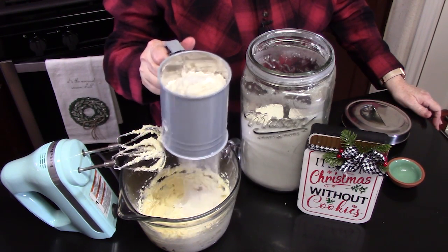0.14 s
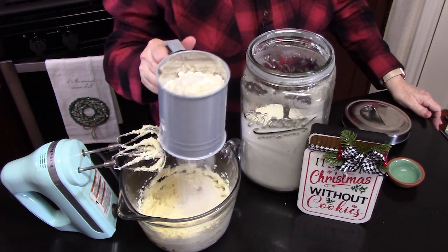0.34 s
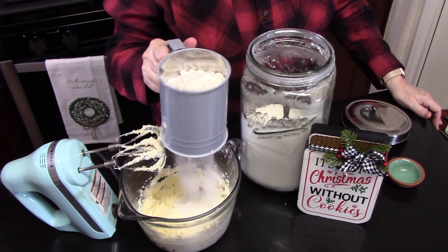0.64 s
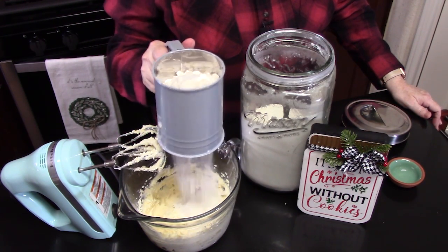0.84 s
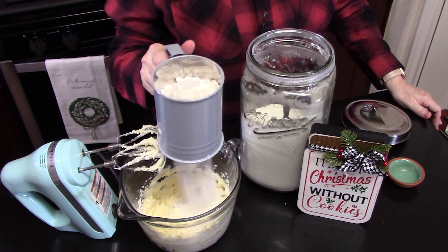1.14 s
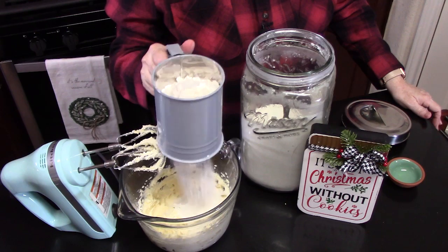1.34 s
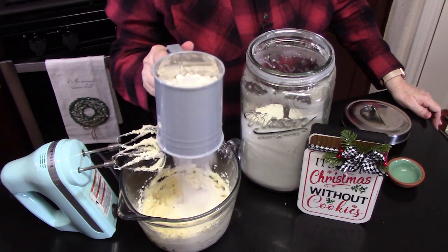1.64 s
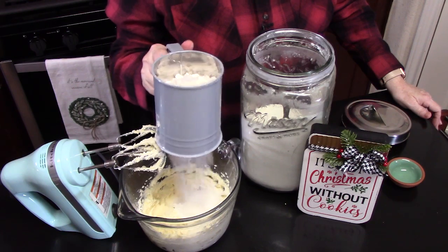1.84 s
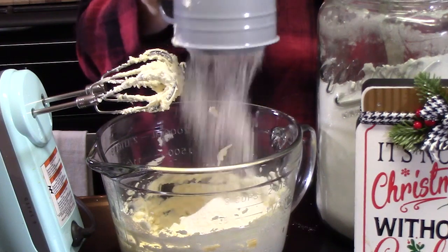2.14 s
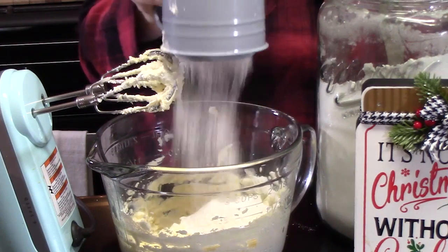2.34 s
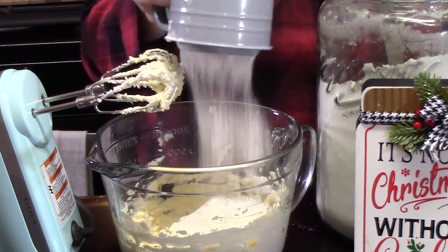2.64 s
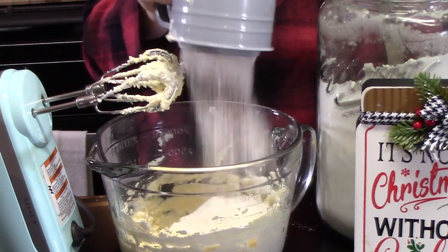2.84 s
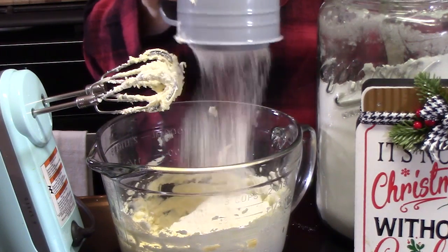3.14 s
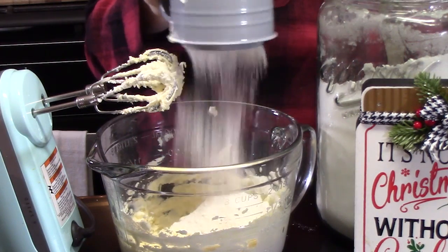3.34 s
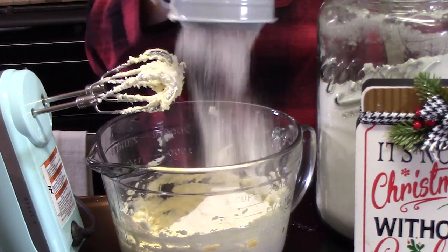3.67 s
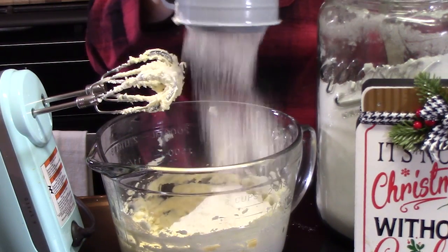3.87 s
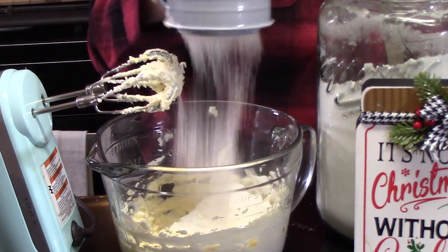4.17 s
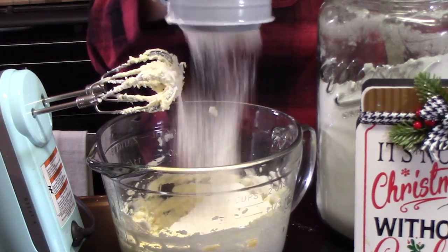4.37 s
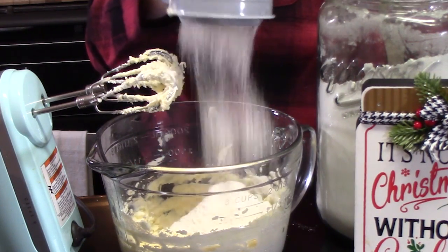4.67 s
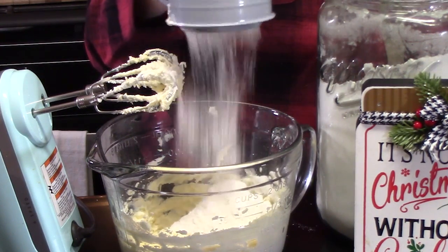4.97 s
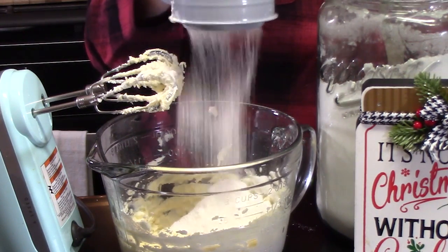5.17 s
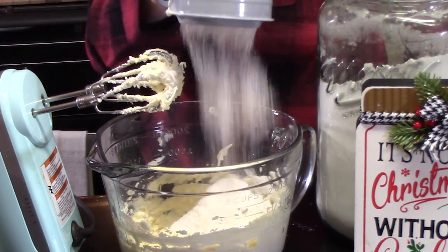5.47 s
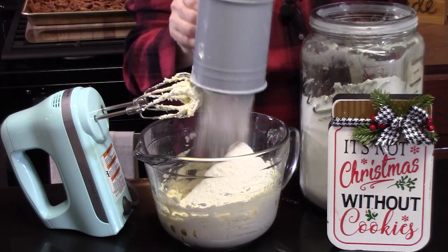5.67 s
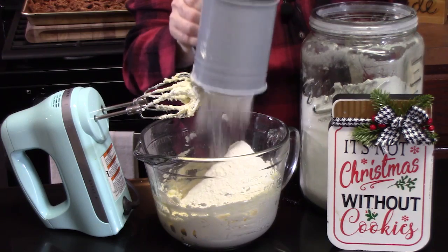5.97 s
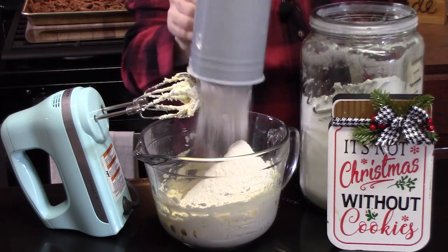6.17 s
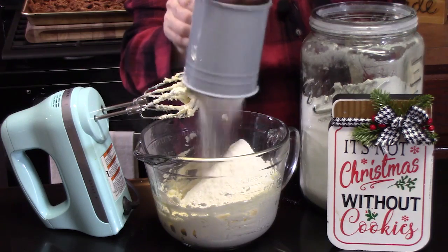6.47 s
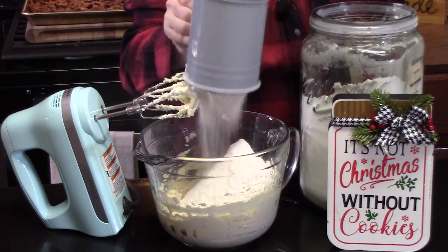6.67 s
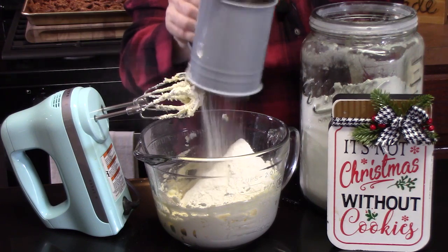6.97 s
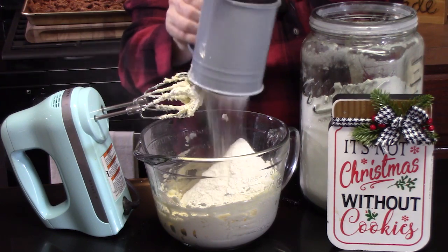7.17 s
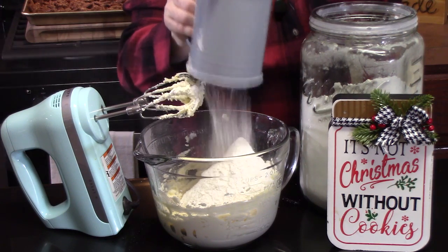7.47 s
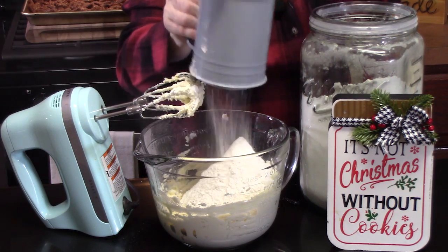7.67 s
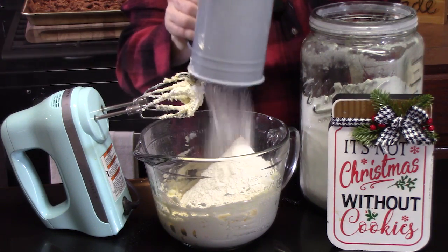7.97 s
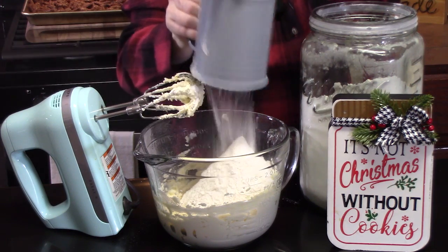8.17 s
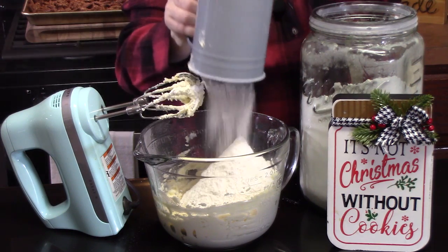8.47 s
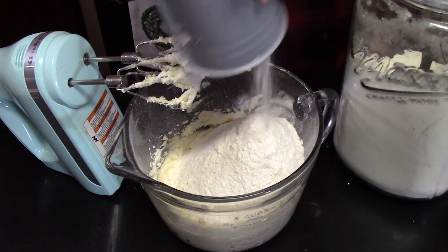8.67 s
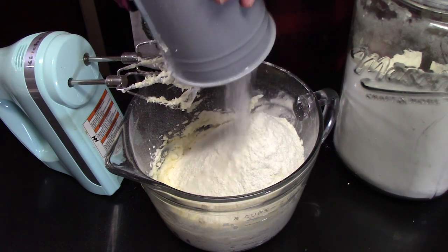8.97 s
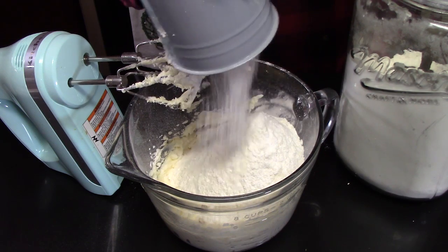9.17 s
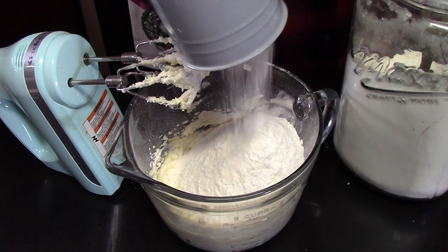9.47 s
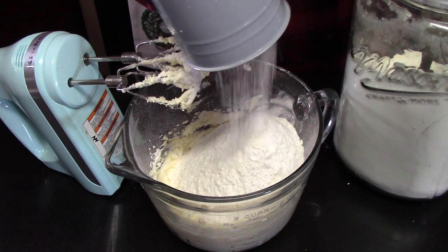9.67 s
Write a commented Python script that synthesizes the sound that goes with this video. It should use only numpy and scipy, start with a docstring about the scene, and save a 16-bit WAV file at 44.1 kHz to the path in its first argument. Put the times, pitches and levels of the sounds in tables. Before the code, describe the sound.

Rapid clicking and soft scraping from a hand sifter give way to hollow, rattling knocks on its can, then sharp, raspy squeezes.

```python
"""In a kitchen, a thin metal flour sifter with a squeeze handle is worked over a glass bowl.
Each squeeze clicks as the lever catches, hits its stop and lets go, while a blade scrapes flour
over the mesh. Midway the can is knocked instead: its wall rings, the air inside gives a hollow thud
and the loose blade rattles. Slower, harder squeezes follow. The room adds a short echo and a faint hiss."""
import sys
import numpy as np
from scipy import signal
from scipy.fft import rfft, irfft, next_fast_len
from scipy.io import wavfile
from scipy.ndimage import uniform_filter1d

SR = 44100
rng = np.random.default_rng(int(sys.argv[2]) if len(sys.argv) > 2 else 0)


def master_out(mix):
    """Clip the mix to full scale and print it as 16-bit PCM to the path in sys.argv[1]."""
    frames = np.transpose(np.atleast_2d(mix))
    ceiling = np.clip(frames, -1, 1)
    pcm = np.round(ceiling * 32767).astype(np.int16)
    wavfile.write(sys.argv[1], SR, pcm)


N = 433062
T = np.arange(N) / SR
AGE = np.arange(SR // 3) / SR   # seconds since a hit

# Levels in the tables are relative: the functions set how loud each layer ends up.
# rumble and hiss of the still kitchen: f/Hz, level/dB
ROOM_TONE = [(12, -35), (20, 0), (146, -6), (328, -10.5), (542, -11), (642, -12.5), (1190, -15),
             (1910, -17), (2530, -17), (2820, -18), (3250, -18), (7310, -18.5), (14700, -21), (16000, -26)]
# how alike that noise is in both ears: f/Hz, likeness (0 to 1)
EAR_LIKENESS = [(60,0.92),(600,0.41),(1500,0.43),(4000,0.099),(10000,0.029)]
# the can's own notes: f/Hz, time to fade 60 dB/s, level/dB for a catch, a stop, a release and a slam
CAN_NOTES = [(433,0.0097,-23,-19,-30,-25),(972,0.029,-29,-4.5,-36,-14),(1287,0.015,-18,3,-27,7.5),(2438,0.009,7,0.5,2,-21),
             (3320,0.012,0,1.5,-1,-6.5),(4220,0.0037,-0.5,-1,-12,-10),(5050,0.0023,-4,1,-8,-24),(6186,0.011,-27,2.5,-4,2.5),
             (6940,0.0043,-6,7,9.5,-3),(7810,0.0031,13.5,13.5,3,5),(8130,0.0033,8.5,3,7,-15),(9280,0.0031,-15,10.5,7,-18),
             (10530,0.0035,-5,2.5,5.5,2),(11760,0.0046,-5,8.5,-4,2),(14000,.003,-20,-50,-25,-24)]
# how bright the sifter sounds over time: t/s, treble tilt/(dB per octave)
BRIGHTNESS = [(0,1.5),(.9,2),(1.8,1.5),(2.05,-3),(2.9,-1.4),(3.7,-1.5),(4.6,-2.5),(5.6,-2),(8.65,2.5),(9.0,2.5),(9.8,1.5)]
# narrow bands where the tight mesh rings: f/Hz, width/Hz, boost/dB
MESH_RINGS = [(1126,130,4),(1282,59,6),(1384,102,6),(1990,180,2.5),(2340,150,3),(2756,175,5),(3240,90,2.5)]
# knocks on the can: t/s, thud level/dB, hollow ring's base f/Hz, wall level/dB
KNOCKS = [(5.72, -21.5, 506, -30), (5.885, -17, 515, -32), (6.05, -18.5, 443, -36), (6.226, -10, 452, -33),
          (6.4, -16.5, 532, -31), (6.579, -14, 513, -33.5), (6.755, -18, 492, -32),
          (6.929, -15.5, 515, -36), (7.108, -22.5, 424, -38), (7.283, -19, 512, -40),
          (7.459, -11, 475, -34), (7.635, -13, 493, -36), (7.81, -10, 483, -28.5),
          (7.985, -12.5, 489, -28.5), (8.156, -18.5, 474, -36), (8.331, -12, 511, -32.5),
          (8.497, -10.5, 523, -30)]
# hollow notes left after a knock: multiple of its base pitch, level/dB, time to fade 60 dB/s
HOLLOW_NOTES = [(.71,-25.5,0.22),(.83,-18,0.12),(.99,-17.5,0.28),(1.05,-20,.26),(1.109,-27,0.26)]
# tone of the loose blade rattling: f/Hz, level/dB
RATTLE_TONE = [(300,-17),(800,1.5),(1400,0),(1900,-1.5),(3000,-0.5),(4000,-6.5),(6000,-7),(8000,-6),(9500,-14.5),(12000,-10.5),(16000,-37)]
# hard squeezes slam the lever home: t/s, click level/dB, wall f/Hz, wall level/dB, wait to let go/s
SLAMS = [(8.6462, -7, 2310, -29, 0.12), (8.9222, -8.5, 1280, -38, 0.081),
         (9.1552, -7.5, 1295, -29.5, 0.077), (9.3769, -9, 1350, -34, .0661),
         (9.5991, -8.5, 1300, -23.5, .0644), (9.8106, -10, 1220, -31, .07)]
# tone of the blade on nearly bare mesh: f/Hz, level/dB
BARE_MESH_TONE = [(100,-36),(350,2),(700,-5),(950,4.5),(1350,0.5),(1700,0.5),(2900,4),(4300,1),(7000,0),(10000,-5.5),(12500,-7.5),(16000,-28)]
# the blade ticks against its rest: t/s, level/dB
TICKS = [(0.173, -26), (0.604, -32), (0.804, -30.5), (9.0723, -25), (9.7346, -25.5)]
# quick squeezes: t/s, travel to the stop/s, wait to let go/s, catch level/dB, stop level/dB
SQUEEZES = [(0.0324, 0.047, 0.042, -25, -15.5), (.263, 0.043, .0372, -25.5, -21.5),
            (.4738, 0.044, 0.027, -24.5, -22.5), (0.6676, 0.046, .0358, -22.5, -16),
            (.8827, .0401, 0.04, -26, -10.5), (1.0924, .0407, 0.041, -22, -9),
            (1.3027, 0.04, .0367, -25, -10.5), (1.508, 0.041, 0.029, -26, -13.5),
            (1.709, .0417, 0.028, -25.5, -10.5), (1.904, 0.04, .013, -25, -36),
            (2.058, .0395, 0.049, -19.5, -10.5), (2.2504, .0405, .0458, -21, -11),
            (2.4483, 0.045, 0.042, -27, -13), (2.649, 0.039, 0.041, -23, -12),
            (2.8497, 0.042, .0437, -22, -14), (3.055, .042, 0.035, -23, -15.5),
            (3.2491, 0.04, .0442, -23.5, -14), (3.453, 0.044, 0.044, -26, -32),
            (3.6648, .0397, .0469, -22.5, -18), (3.872, 0.042, .0369, -24, -22.5),
            (4.0764, .0427, 0.038, -26, -17), (4.2812, 0.044, 0.027, -28, -20),
            (4.4726, 0.043, .0336, -23.5, -18.5), (4.675, .0426, 0.043, -22.5, -15),
            (4.8878, 0.042, 0.036, -23, -17), (5.0932, 0.041, 0.046, -22.5, -15),
            (5.3013, 0.045, 0.038, -28, -18), (5.511, 0.043, .0225, -23, -21.5)]
# tone of the blade on mesh muffled by flour: f/Hz, level/dB
FLOURY_MESH_TONE = [(80,-20),(250,1),(560,1.5),(750,-12),(1000,1),(1300,-1),(1700,-0.5),(2400,-5),(3300,-3),(4300,-6),(7000,-8.5),(10000,-11.5),(13000,-15),(16000,-35)]
# the scrape softens as the cup empties: t/s, level/dB
SCRAPE_LEVEL = [(0, -41.5), (1.7, -40.5), (2.0, -43.5), (2.7, -41), (3.8, -42), (4.35, -44.5), (5.5, -44.5)]

REGRIP_S, KNOCKING_END_S = 5.578, 8.56   # the hand changes its hold to knock; it stops knocking


def from_db(db):
    """Turn decibels into a number to multiply by."""
    return 10 ** (np.asarray(db) / 20)


def unit(x, size=None, axis=None):
    """Scale a sound to an average strength (rms) of 1 over its first `size` samples."""
    return x / np.sqrt(np.mean(x[..., :size] ** 2, axis=axis, keepdims=True) + 1e-20)


def at_hz(points, hz):
    """Look up a table's value at any frequency."""
    f, value = np.transpose(points)
    return np.interp(np.log(hz + 1), np.log(f), value)


def colour(x, tone):
    """Shape the bass and treble of a steady sound to follow a tone table."""
    size = next_fast_len(N)
    gains = from_db(at_hz(tone, np.arange(size // 2 + 1) * SR / size))
    return unit(irfft(rfft(x, size) * gains, size)[..., :N])


def gentle_filter(x, hz, keep="low", order=1):
    """Keep the low or the high side of a frequency and fade the other."""
    return signal.sosfilt(signal.butter(order, hz, keep, fs=SR, output="sos"), x)


def add(track, s, sound):
    """Mix a sound into a track at `s` seconds."""
    start = min(max(round(s * SR), 0), N)
    track[..., start:start + sound.shape[-1]] += sound[..., :N - start]


def ring(hz, t60, phase=0):
    """One pure note that fades by 60 dB in `t60` seconds."""
    return np.sin(2 * np.pi * hz * AGE + phase) * from_db(-60 * AGE / t60)


def stroke(start, end, rise, fall, first_db):
    """Loudness of one sweep: it picks up, changes steadily and runs out (times in seconds)."""
    times = [start, start + rise, max(end, start + rise), end + fall]
    return np.interp(T, times, [0, from_db(first_db), 1, 0], left=0, right=0)


def shiver(hits, rise, t60):
    """Loudness that jumps up and dies away after each hit (t/s, level/dB)."""
    out = np.zeros(N)
    shape = (1 - np.exp(-AGE / rise)) * from_db(-60 * AGE / t60)
    for s, db, *_ in hits:
        add(out, s, from_db(db) * shape / shape.max())
    return out


def lean_left(pair, db):
    """Make the left side `db` louder than the right."""
    return pair * from_db([[db / 2], [-db / 2]])


def room_noise():
    """A low rumble, alike in both ears, under a hiss that differs between them."""
    alike = np.clip(at_hz(EAR_LIKENESS, np.arange(N // 2 + 1) * SR / N), 0, 1)
    mid, side = rfft(rng.standard_normal((2, N)))
    pair = irfft(np.sqrt(1 + alike) * mid + np.sqrt(1 - alike) * side * [[1], [-1]], N)
    return lean_left(from_db(-51) * colour(pair, ROOM_TONE), db=0.5)


def kitchen_echo(x, echo_db, t60, dull_hz):
    """The room adds a short blur of echoes, alike on both sides in the bass but not in the treble."""
    mid, side = rng.standard_normal((2, len(AGE))) * from_db(-60 * AGE / t60) * (AGE > .004)
    side = gentle_filter(side, 1800, "high")
    tail = gentle_filter([mid + side, mid - side], dull_hz)
    tail = tail / np.sqrt(np.sum(tail ** 2, axis=1, keepdims=True))
    return x + from_db(echo_db) * signal.fftconvolve(x, tail, axes=1)[:, :N]


def blade_on_mesh(tone, per_s, spread_db, stereo):
    """Tiny random hits bunch up as the blade grips and slips; the tight mesh rings with them."""
    hits = (rng.random((3, N)) < per_s / SR) * rng.standard_normal((3, N))
    hits *= from_db(spread_db * np.minimum(rng.exponential(1, (3, N)), 4))
    grip = unit(uniform_filter1d(rng.standard_normal(N), size=SR // 250))
    grit = colour((hits[0] + stereo * hits[1:]) * from_db(2 * np.clip(grip, -2, 2)), tone)
    for hz, width_hz, boost_db in MESH_RINGS:
        band = signal.lfilter(*signal.iirpeak(hz, hz / width_hz, fs=SR), grit)
        grit = grit + (from_db(boost_db) - 1) * band
    return unit(grit)


def clicks(hits, kind, gain_db, chatter_s, uneven_db=-0.9):
    """Metal meets metal and chatters briefly; each kind of hit rings its own mix of the can's notes."""
    out, size = np.zeros((2, N)), SR // 25
    hz, t60, *mixes = np.transpose(CAN_NOTES)
    mix_db = mixes[["catch", "stop", "release", "slam"].index(kind)]
    notes = ring(hz[:, None], t60[:, None])[None, :, :size]
    for s, db, *_ in hits:
        both_ears, each_ear = rng.standard_normal((len(hz), size)), rng.standard_normal((2, len(hz), size))
        lumpy_fade = np.exp(0.57 * rng.standard_normal(size) - AGE[:size] / chatter_s)
        chatter = (both_ears + 0.39 * each_ear) * lumpy_fade
        rings = unit(signal.fftconvolve(chatter, notes, axes=2)[..., :size], axis=(0, 2))
        tilt_db = np.interp(s, *np.transpose(BRIGHTNESS)) * np.log2(hz)
        gains = from_db(mix_db + tilt_db + uneven_db * rng.standard_normal(len(hz)))
        click = np.sum(rings * gains[:, None], axis=1)
        add(out, s, from_db(db + gain_db) * unit(click, size=SR // 500))
    return out


def blade_ticks():
    """Now and then the blade taps lightly against its rest."""
    return clicks(TICKS, "release", gain_db=-11.5, chatter_s=0.0014)


def handling():
    """Handling keeps the can sounding faintly at its hollow pitch, most as the grip changes."""
    holding = from_db(-62.5) * stroke(REGRIP_S, KNOCKING_END_S, rise=0.0068, fall=.02, first_db=4.5)
    regrip = shiver([(REGRIP_S, -48)], rise=0.0087, t60=0.14)
    hollow = colour(rng.standard_normal(N), [(200, -34), (440, -19), (515, -0.5), (600, -13), (1200, -57)])
    return (holding + regrip) * hollow


def wall_ring(db):
    """A knock rings two low notes of the thin wall, tuned a little differently each time."""
    wall = 0
    for hz, t60, _, stop_db, *_ in CAN_NOTES[1:3]:
        pitch = hz * (1 + 0.038 * rng.normal())
        wall += from_db(stop_db) * ring(pitch, t60 * 0.9, rng.uniform(0, 2 * np.pi))
    return from_db(db) * unit(wall * (1 - np.exp(-AGE / 0.0011)), size=SR // 200)


def thud(hz, t60=0.047, bend=0.25, bend_s=0.0059):
    """A soft blow flexes the can with a low bump; the air inside rings, rising as the hand leaves."""
    cycles = hz * (AGE - bend * bend_s * (1 - np.exp(-AGE / bend_s)))
    air = np.sin(2 * np.pi * cycles) * from_db(-60 * AGE / t60)
    bump = from_db(-12) * ring(296, t60=0.013)
    soft = gentle_filter(-air - bump, 706, order=2)
    return unit(gentle_filter(soft, 110, "high"), size=SR // 150)


def hollow_ring(base_hz):
    """A cluster of hollow notes swells and lingers after a knock."""
    notes = 0
    for ratio, db, t60 in HOLLOW_NOTES:
        gain = from_db(db + 1.2 * rng.normal())
        pitch = base_hz * ratio * (1 + 0.012 * rng.normal())
        notes += gain * ring(pitch, t60, rng.uniform(0, 2 * np.pi))
    return notes * (1 - np.exp(-AGE / 0.0059))


def blade_rattle(jolts, flight_s=.018):
    """The loose blade shifts as the grip changes, then jumps and lands at every knock."""
    regrip = shiver([(REGRIP_S, -43)], rise=0.0045, t60=0.1)
    jump = shiver([(s + 0.0021, db + 0.5) for s, db in jolts], rise=0.00039, t60=0.13)
    landing = shiver([(s + flight_s, db - 2.5) for s, db in jolts], rise=0.00088, t60=0.075)
    return (regrip + jump + landing) * blade_on_mesh(RATTLE_TONE, per_s=3900, spread_db=-2.5, stereo=.3)


def knocks():
    """At each knock the wall rings, the air inside booms and the blade rattles."""
    out, jolts = np.zeros(N), []
    for s, db, hz, wall_db in KNOCKS:
        add(out, s + 0.00143, wall_ring(wall_db - 3))
        add(out, s + 0.00259, from_db(db - 9) * thud(hz * 1.105))
        add(out, s + 0.00244, from_db(db - 6) * hollow_ring(hz))
        rattle_db = -32 + 0.29 * wall_db
        jolts.append((s, rattle_db))
        for late in 0.029 + .003 * rng.standard_normal(2):   # the blade lands twice with a tinny ring
            add(out, s + late, from_db(rattle_db + 2) * ring(2880 * (1 + 0.036 * rng.normal()), 0.027))
    return out + blade_rattle(jolts)


def hard_squeezes():
    """The blade speeds up into a slam that leaves it buzzing and the wall ringing, then coasts back."""
    loudness = from_db(-22) * shiver(SLAMS, rise=0.0011, t60=0.088)
    wall, releases = np.zeros(N), []
    for s, _, hz, wall_db, wait in SLAMS:
        release = s + wait
        run_up = stroke(s - 0.039, s, rise=0.0033, fall=0.0048, first_db=-7)
        coast = stroke(release + 0.0063, release + .075, rise=0.0056, fall=0.048, first_db=11)
        loudness += from_db(-44) * run_up + from_db(-52) * coast
        add(wall, s, from_db(wall_db) * ring(hz, t60=0.049))
        releases.append((release, -32))
    scrape = loudness * blade_on_mesh(BARE_MESH_TONE, per_s=7000, spread_db=0.5, stereo=0.26)
    return (scrape + wall + clicks(SLAMS, "slam", gain_db=-14, chatter_s=0.0019, uneven_db=2)
            + clicks(releases, "catch", gain_db=0, chatter_s=0.0018))


def flour_scrape(loudness):
    """The blade rubs flour over the mesh; when the sifter sounds dull, the scrape gains bass too."""
    scrape = loudness * blade_on_mesh(FLOURY_MESH_TONE, per_s=12000, spread_db=1.37, stereo=0.16)
    bass_db = -1.5 * np.interp(T, *np.transpose(BRIGHTNESS))
    return scrape + gentle_filter(scrape, 1800) * (from_db(bass_db) - 1)


def quick_squeezes(spring_back_s=.054):
    """About five squeezes a second: catch, scrape, stop, release, and a spring pulls the blade back."""
    loudness, catches, stops, releases = np.zeros(N), [], [], []
    for s, travel, wait, catch_db, stop_db in SQUEEZES:
        stop, release = s + travel, s + travel + wait
        catches.append((s, catch_db))
        stops.append((stop, stop_db))
        push = stroke(s + 0.0055, stop + 0.0027, rise=0.0023, fall=0.014, first_db=-1.5)
        loudness += from_db(-3) * push   # the push scrapes less than the return
        home = release + spring_back_s
        if home < REGRIP_S:   # the lever is held in once the knocking begins
            releases.append((release, -17.5 + .55 * catch_db))   # louder after a louder catch
            loudness += stroke(release + 0.0034, home, rise=0.0098, fall=0.01, first_db=-2.5)
    loudness *= from_db(np.interp(T, *np.transpose(SCRAPE_LEVEL)))
    loudness += from_db(-34) * shiver(stops, rise=0.00035, t60=0.033)   # the stop shakes the blade
    return (flour_scrape(loudness) + clicks(catches, "catch", gain_db=-9, chatter_s=0.0017)
            + clicks(stops, "stop", gain_db=-12, chatter_s=0.00097)
            + clicks(releases, "release", gain_db=-.5, chatter_s=0.0017))


def scene():
    """The sifter in the kitchen, louder and a little earlier on the left."""
    sifter = quick_squeezes() + blade_ticks() + knocks() + handling() + hard_squeezes()
    left, right = kitchen_echo(sifter, echo_db=-15, t60=0.33, dull_hz=6100)
    size, delay_s = next_fast_len(N), 2e-5
    hz = np.arange(size // 2 + 1) * SR / size
    right = irfft(rfft(right, size) * np.exp(-2j * np.pi * hz * delay_s), size)[:N]
    return lean_left(np.array([left, right]), db=5.5) + room_noise()


def record(dry):
    """Cut the treble steeply above 16000 Hz."""
    return signal.sosfilt(signal.ellip(10, .2, 80, 16000, fs=SR, output="sos"), dry)


dry = scene()
out = record(dry)
master_out(out)
```